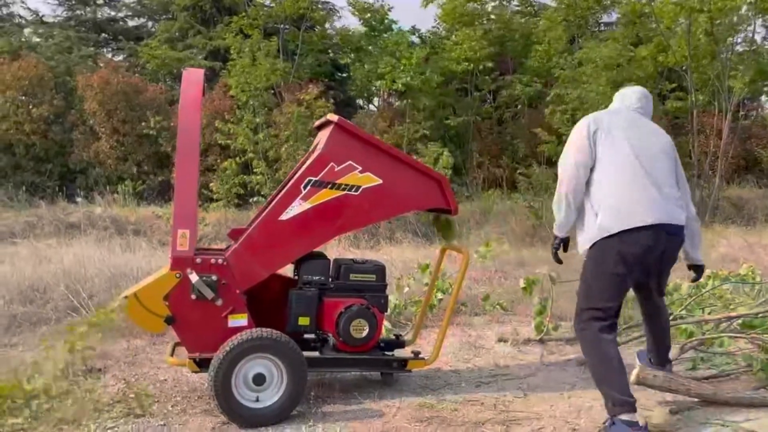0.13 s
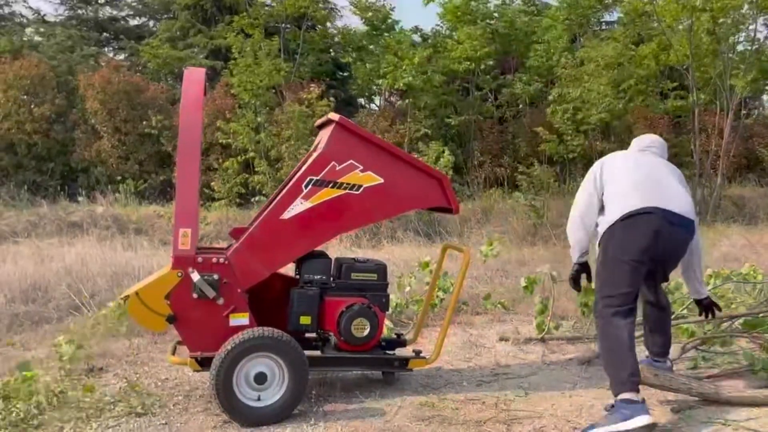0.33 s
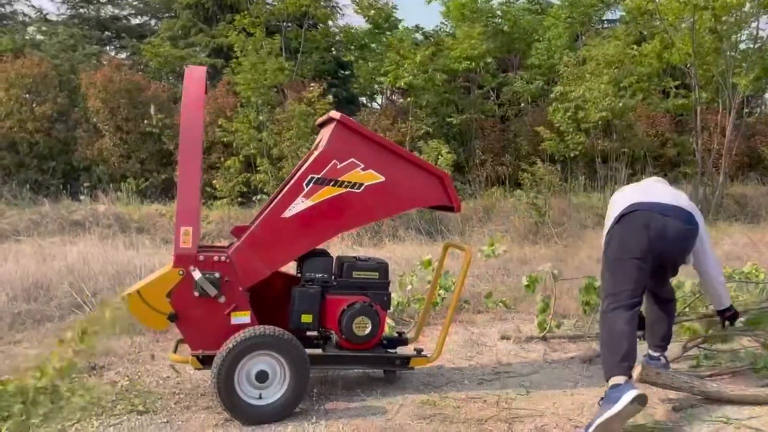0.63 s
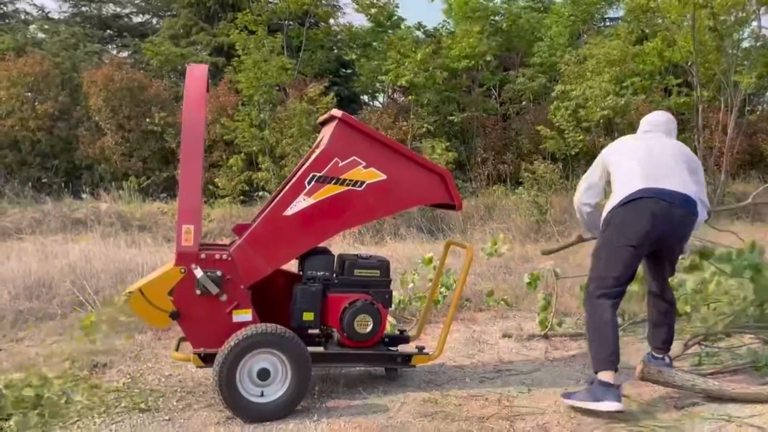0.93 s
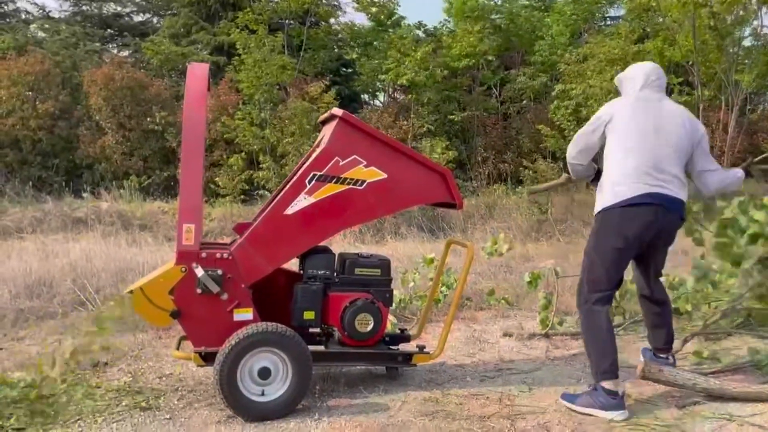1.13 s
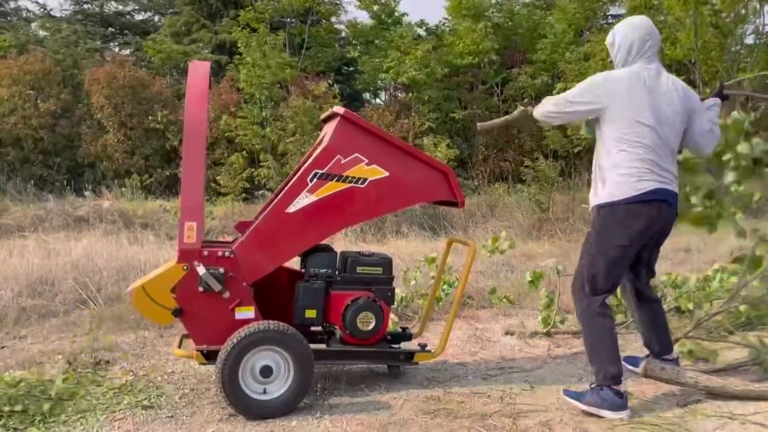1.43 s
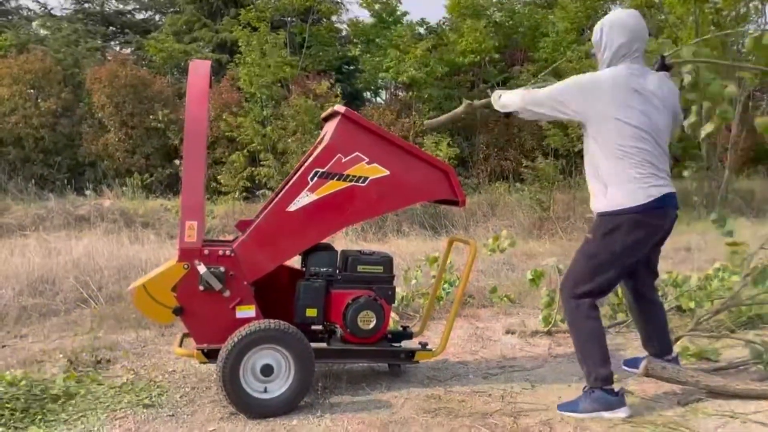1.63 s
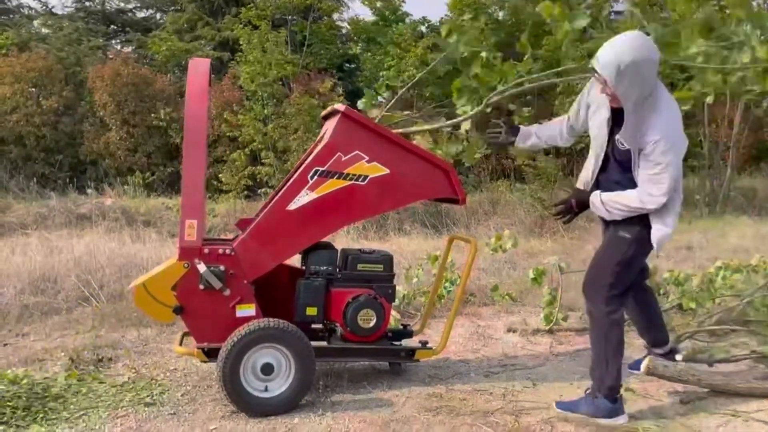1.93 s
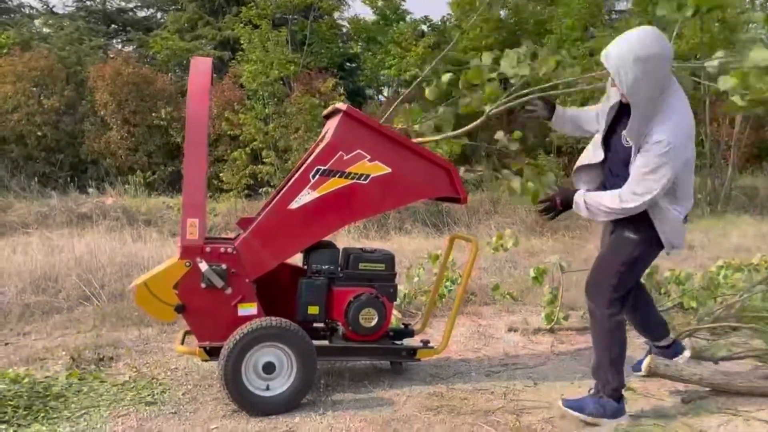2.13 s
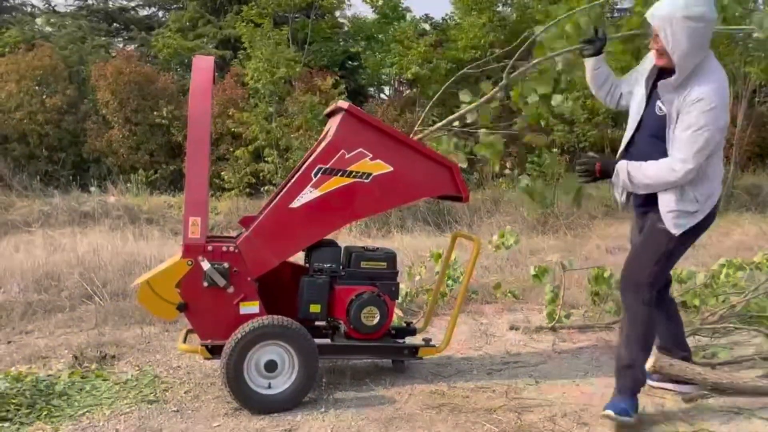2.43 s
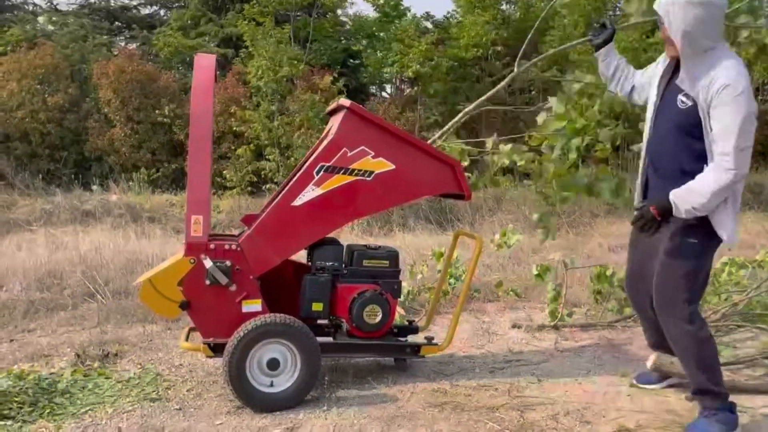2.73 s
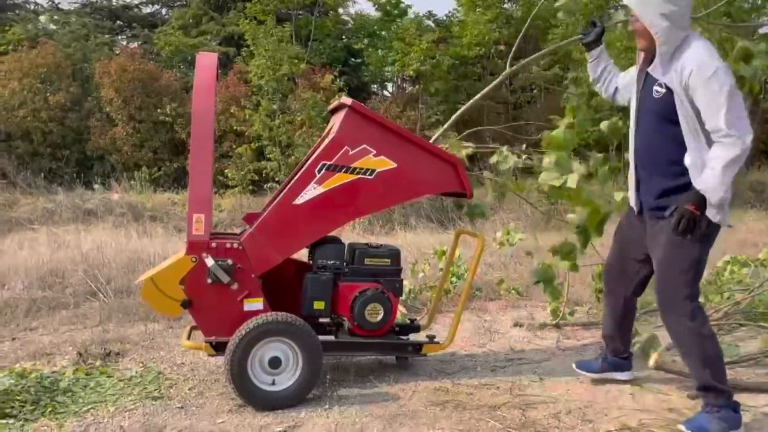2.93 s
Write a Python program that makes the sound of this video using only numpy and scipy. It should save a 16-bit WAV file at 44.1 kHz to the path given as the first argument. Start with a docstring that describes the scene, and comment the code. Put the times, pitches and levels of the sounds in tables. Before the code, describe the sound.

Loud wood chipper engine and drum drone, crunching hiss fading out, then hollow knocks on sheet steel.

```python
"""Petrol wood chipper outdoors: a one-cylinder four-stroke engine belts a two-knife drum, both wavering tones.
First the last twigs are shredded: chip grains, grinding noise, leaf crackles and decaying sine knocks.
At about 1.2 s the drum unloads and runs on empty: tone balance shifts, pulsing noise roars on.
From 1.8 s a new branch thumps the steel hopper (decaying modes); a few faint crackles follow."""
import sys
import numpy as np
from scipy import signal
from scipy.fft import rfft, irfft
from scipy.io import wavfile
from scipy.ndimage import uniform_filter1d

SR = 44100
rng = np.random.default_rng(int(sys.argv[2]) if len(sys.argv) > 2 else 0)


def put_to_file(sound):
    """Save the sound as 16-bit audio at rate SR, in the file named by the first command-line argument."""
    columns = np.atleast_2d(sound).T  # one column per channel
    safe = np.clip(columns, -1, 1)
    whole_steps = np.round(safe * 32767)
    wavfile.write(sys.argv[1], SR, whole_steps.astype(np.int16))


def boost(x):
    """Linear amplitude factor 10**(x/20) for a level x in decibels (scalar or array-like)."""
    u = np.asarray(x, float) / 20
    return 10 ** u


N = 135828
T = np.arange(N) / SR

# firing rate and knife passing rate: (time [s], rate [Hz])
FIRING_HZ = [(0, 31), (.35, 31), (.7, 31), (1.2, 31.15), (2.3, 31.3), (2.7, 31.4), (3.08, 31.35)]
KNIVES_HZ = [(0, 80.5), (.2, 80.9), (.4, 81), (.8, 81.55), (1.05, 82.1), (1.4, 82.2), (2, 82.3),
             (3.08, 82.25)]

# engine tones under load and empty: (multiple of firing rate, relative level [dB])
ENGINE_LOADED = [(2, -8), (3, -16), (4, 1), (5, -5.5), (6, -6), (7, -11.5), (9, -12), (10, -10),
                 (11, -11.5), (12, -3.5), (14, -10.5)]
ENGINE_EMPTY = [(2, -3), (3, -31), (4, 2), (5, 0), (6, -12), (7, -12), (9, -13.5), (10, -10.5), (11, -9),
                (12, -7), (14, -17.5)]
# drum tones under load and empty: (multiple of knife rate, relative level [dB])
DRUM_LOADED = [(1, -5.5), (2, -1.5), (3, -5), (4, -5.5), (5, 2), (6, -4), (7, -8.5), (8, -15.5), (9, -22),
               (10, -15), (11, -9), (12, -16), (13, -12), (14, -18), (15, -15), (16, -9), (17, -24),
               (18, -11.5), (19, -18), (20, -18), (21, -48), (22, -21), (23, -23), (24, -13)]
DRUM_EMPTY = [(1, -10), (2, -2.5), (3, 0.5), (4, -7), (5, -2.5), (6, -4), (7, -7), (8, -12), (9, -18),
              (10, -9.5), (11, -13.5), (12, -14), (13, -18), (14, -24), (15, -28), (16, -18), (17, -16.5),
              (18, -23), (19, -17.5), (20, -25), (21, -20), (22, -23), (23, -21), (24, -16.5)]
# relative level of all engine tones, all drum tones: (time [s], level [dB])
ENGINE_LEVEL_DB = [(0, 5), (.3, 1.5), (.7, 2.5), (1.1, 1), (1.35, -2), (1.7, 0), (2.3, 1.5), (2.5, -4),
                   (2.65, -1), (3.08, -1.5)]
DRUM_LEVEL_DB = [(0, 1), (.5, -2.5), (1.2, -4.5), (1.4, -5), (1.9, -0.5), (2.5, -2), (3.08, -2.5)]
# engine order 4, boom of the exhaust; order 12, drone under the howl: (time [s], relative level [dB])
BOOM_DB = [(0, -10), (.15, 0.5), (.4, -2.5), (.6, 1), (.8, -1), (1, 4.5), (1.15, 3.5), (1.4, 1), (1.7, -1),
           (2.1, -4), (2.3, 1.5), (2.46, -9), (2.62, 9.5), (2.72, 3), (2.8, -9), (3, 8), (3.08, 7.5)]
DRONE_DB = [(0, -1), (.2, -2.5), (.38, 5), (.55, -5), (.73, 7), (.9, -4), (1.12, 2), (1.3, -1), (2, -5),
            (2.5, -10), (3.08, 1)]
# knife order 3, hum of the drum; 5, howl of the chute; 6; 7, thin note: (time [s], relative level [dB])
HUM_DB = [(0, -2), (.3, -2), (.5, 3.5), (.8, 1.5), (1, 2.5), (1.2, 5), (1.31, -0.5), (1.42, 6.5),
          (1.52, -2), (1.62, 4.5), (1.8, 1.5), (1.93, -4.5), (2.1, 0.5), (2.25, 1), (2.55, 0), (2.7, 3),
          (3.08, 4)]
HOWL_DB = [(0, -2), (.7, 0), (1.25, 7), (1.42, -6), (1.6, 4.5), (1.85, -3), (2, 6.5), (2.25, -0.5),
           (2.5, 6), (2.65, -4), (2.82, 9.5), (3.08, -17)]
SIXTH_DB = [(0, -5), (.2, 2), (.42, -5.5), (.62, 3.5), (.85, 0), (1.05, 2), (1.14, -6), (1.25, 2),
            (1.4, -5), (1.6, 1.5), (2.1, 1), (2.5, 3), (2.8, 1), (3.08, 0)]
NOTE_DB = [(0, -4), (.5, 2.5), (.85, -2.5), (1.05, 6), (1.3, -6), (1.7, 2), (2.05, 4.5), (2.3, 1),
           (2.5, -6), (2.65, -4), (2.85, 4.5), (3.08, 2.5)]
# knife orders 16 and 18, whine while wood is cut: (time [s], relative level [dB])
WHINE_DB = [(0, -7), (.18, -4), (.25, 7), (.4, 3.5), (.55, 7), (.72, 0), (1, 1), (1.3, 2), (3.08, -8)]
ENGINE_DB, DRUM_DB = -33, -30.5
ENGINE_WAVER_DB, DRUM_WAVER_DB, WAVER_HZ = 1.8, 1.3, 7
UNLOAD_MID_S, UNLOAD_LENGTH_S = 1.19, 0.48
PHASE_SPREAD_TURNS = .7  # under 1 the orders add up to a soft pulse per pass

# chip hiss before its final fade: (time [s], level [dB])
SHRED_DB = [(0, -28.5), (.19, -30.5), (.24, -26.5), (.29, -30.5), (.49, -29.5), (.6, -30.5), (.75, -34),
            (.84, -39.5), (.93, -33.5), (.97, -39), (1.02, -36), (1.07, -38), (1.12, -41.5), (1.2, -45),
            (1.3, -44), (1.4, -58)]
# chips in the chute, spectrum: (frequency [Hz], relative level [dB])
CHIP_SPECTRUM = [(1500, -40), (2500, -22), (3300, -13.5), (4200, -7), (4850, -2), (5150, 2), (5400, 1.5),
                 (5700, -1), (6200, -6), (6800, -4), (7400, -6.5), (8700, -7), (9300, -13.5), (10500, -15),
                 (12000, -18), (14500, -23)]
CHIPS_PER_S, CHIP_SPREAD_DB, CHIP_DECAY_S, CLUMP_DB = 3500, 3.2, .002, .7
SHRED_OFF_S, SHRED_FADE_S = 1.375, 0.22

# wood grinding under the knives: (time [s], level [dB])
GRIND_DB = [(0, -30), (.2, -30), (.45, -32), (.7, -33.5), (.85, -39), (1, -37), (1.15, -37), (1.3, -49),
            (1.45, -58)]
# grinding spectrum: (frequency [Hz], relative level [dB])
GRIND_SPECTRUM = [(300, -15), (600, -2.5), (800, 1), (1050, -1), (1300, 0.5), (1600, -5), (2000, -2),
                  (2500, -6.5), (3300, -11.5), (4200, -17), (6000, -38)]
STRAND_DB = 3.5

# last chunks of wood knocking the housing: (time [s], level [dB], pitch [Hz])
KNOCKS = [(.133, -16, 150), (.235, -19, 201), (.768, -17, 150), (.866, -17, 130), (.925, -20, 130),
          (.996, -14, 162), (1.025, -19, 154)]
KNOCK_RISE_S, KNOCK_T60_S = 0.0046, 0.068

# dry leaves: (time [s], level [dB], decay to 1/e [s])
CRACKLES = [(.005, -42, .02), (0.096, -40, .03), (.235, -42, .03), (0.377, -40, .02), (.41, -36, .02),
            (0.49, -40, .025), (.59, -47, .02), (.68, -51, .02), (.745, -48, .02), (.915, -55, .025),
            (1.005, -45, .025), (1.05, -50, .02), (1.89, -58, .04), (2.51, -55, .03), (2.605, -56, .03)]
# crackle spectrum: (frequency [Hz], relative level [dB])
CRACKLE_SPECTRUM = [(1500, -30), (3000, 6), (7000, -12), (10000, 7), (14500, -15)]
CRACKLE_RISE_S = .004

# branch on the hopper: (time [s], level [dB], tilt [dB per octave above TILT_FROM_HZ])
THUMPS = [(1.81, -12.5, -3), (1.851, -14.5, 0), (1.885, -17, -3), (1.909, -18, 2), (1.945, -19, -6),
          (1.967, -18, -6), (2.13, -30, -10)]
# hopper modes: (frequency [Hz], relative level [dB], t60 [s])
HOPPER_MODES = [(96, -4, 0.12), (140.7, -3.5, 0.36), (175, -3, 0.1), (317, -12, 0.18), (400, -14, 0.088),
                (470, -5.5, 0.16), (593, -6, 0.08), (850, -13, .1), (1260, -24, 0.051), (1920, -20, 0.096)]
THUMP_RISE_S, TILT_FROM_HZ, MODE_DROP_DB = 0.007, 140, 3.3

# machine roar (exhaust, air, panels), spectrum: (frequency [Hz], relative level [dB])
ROAR_SPECTRUM = [(18, -63), (30, -19), (50, -7.5), (100, -3.5), (150, -5.5), (210, -8), (300, -10),
                 (420, -6), (520, -11), (650, -15), (880, -11), (1090, -15.5), (1300, -10.5), (1700, -22.5),
                 (2050, -16), (2300, -19.5), (2550, -24), (3200, -25.5), (4200, -24), (4900, -22),
                 (5400, -19.5), (5800, -25), (6500, -26.5), (8000, -30.5), (9000, -37), (11600, -36.5),
                 (14500, -48)]
# roar below the treble, before ROAR_GAIN_DB: (time [s], level [dB])
ROAR_LEVEL_DB = [(1.2, -40), (1.482, -38), (1.624, -39), (1.854, -35.5), (2.11, -38.5), (2.136, -35),
                 (2.152, -39), (2.294, -37), (3.058, -36), (3.08, -41)]
# treble rasp of the drum housing, before RASP_GAIN_DB: (time [s], level [dB])
RASP_LEVEL_DB = [(1.3, -53), (1.422, -53.5), (1.894, -49.5), (2.232, -50), (2.34, -53), (2.384, -50),
                 (2.414, -53), (2.648, -48), (2.668, -52.5), (2.708, -50), (3.03, -51.5), (3.08, -52)]
ROAR_GAIN_DB, RASP_GAIN_DB = 10, 14.5
FIRE_DEPTH, KNIFE_DEPTH, THROB_DEPTH = .05, .07, .45
THROB_BELOW_HZ, RASP_ABOVE_HZ = 350, 3600

PANEL_DB, PANEL_SPACING_HZ, PATCH_DB = 1.7, 25, 1.8
# microphone, a narrow dip and the band limit: (frequency [Hz], gain [dB])
MIC = [(5, -20), (20, -9), (40, 0), (6800, 0), (7100, -5), (7500, -3), (7900, -12), (8150, -17), (8400, -6),
       (8700, 0), (13900, 0), (14450, -6), (14600, -60), (22050, -60)]


def evened(x):
    """Scales to rms 1."""
    return x / np.sqrt(np.mean(x ** 2) + 1e-20)


def curve(points):
    """Joins (time [s], value) rows over time."""
    return np.interp(T, *np.transpose(points))


def shape(x, points):
    """Filters x by a (frequency [Hz], gain [dB]) spectrum, on a log frequency axis."""
    f, db = np.transpose(points)
    hz = np.fft.rfftfreq(N, 1 / SR)
    gain = boost(np.interp(np.log(hz + 1), np.log(f + 1), db))
    return irfft(rfft(x) * gain, N)


def colour(x, points):
    """Shapes x by a spectrum; rms 1."""
    return evened(shape(x, points))


def wander(hz, count):
    """Slow random curves of about rms 1, low-passed at hz."""
    knots = rng.standard_normal((count, 400))
    t = np.arange(400) / 100  # 100 knots per second
    b, a = signal.butter(2, np.clip(hz / 50, .01, .9))
    smooth = signal.lfilter(b, a, knots)[:, 60:]  # drops the filter's start
    return np.array([np.interp(T, t[:-60], evened(row)) for row in smooth])


def patchy(x, size, bins, frames, depth_db):
    """Noise whose level varies in random patches of bins by frames; depth_db per bin or one value."""
    z = signal.stft(x, nperseg=size, noverlap=size * 3 // 4)[2]
    patches = rng.standard_normal(z.shape[::-1]).T
    patches = uniform_filter1d(patches, size=bins, axis=0)
    patches = evened(uniform_filter1d(patches, size=frames, axis=1))
    return signal.istft(z * boost(depth_db * patches), nperseg=size, noverlap=size * 3 // 4)[1][:N]


def orders(turns, loaded, empty, waver_db, order_db):
    """Tones on multiples of a rate, each wavering, their balance changing as the load goes."""
    load = np.clip(.5 - (T - UNLOAD_MID_S) / UNLOAD_LENGTH_S, 0, 1)
    wavers = wander(WAVER_HZ, count=len(empty))
    starts = rng.random(len(empty))
    out = np.zeros(N)
    for (k, full_db), (_, empty_db), waver, start in zip(loaded, empty, wavers, starts):
        level_db = empty_db + (full_db - empty_db) * load + waver_db * waver + order_db.get(k, 0)
        phase = k * turns + PHASE_SPREAD_TURNS * start
        out += np.sqrt(2) * boost(level_db) * np.cos(2 * np.pi * phase)
    return out


def engine(firing):
    """Engine tones on multiples of the firing rate."""
    order_db = {4: curve(BOOM_DB), 12: curve(DRONE_DB)}
    tones = orders(firing, ENGINE_LOADED, ENGINE_EMPTY, ENGINE_WAVER_DB, order_db)
    return boost(ENGINE_DB + curve(ENGINE_LEVEL_DB)) * tones


def drum(knives):
    """Drum tones on multiples of the knife passing rate."""
    whine = curve(WHINE_DB)
    order_db = {3: curve(HUM_DB), 5: curve(HOWL_DB), 6: curve(SIXTH_DB), 7: curve(NOTE_DB),
                16: whine, 18: whine}
    tones = orders(knives, DRUM_LOADED, DRUM_EMPTY, DRUM_WAVER_DB, order_db)
    return boost(DRUM_DB + curve(DRUM_LEVEL_DB)) * tones


def chips(knives):
    """Dense clumped grains of wood and leaf flung through the chute by each knife."""
    t = np.arange(600) / SR
    spread_db = CHIP_SPREAD_DB * np.minimum(rng.exponential(1, N), 5)
    size = boost(spread_db + CLUMP_DB * wander(14, count=1)[0])
    chance = CHIPS_PER_S / SR * (1 + .1 * np.cos(2 * np.pi * knives))
    hits = size * (rng.random(N) < chance)
    power = signal.oaconvolve(hits ** 2, np.exp(-t / CHIP_DECAY_S))[:N]
    grains = colour(np.sqrt(abs(power)) * rng.standard_normal(N), CHIP_SPECTRUM)
    fade = np.clip((SHRED_OFF_S - T) / SHRED_FADE_S, 0, 1)
    return boost(curve(SHRED_DB)) * fade * grains


def grind():
    """Wood grinding in the housing: noise in which thin tones ring up for a moment here and there."""
    strands = patchy(rng.standard_normal(N), 4096, bins=2, frames=7, depth_db=STRAND_DB)
    return boost(curve(GRIND_DB)) * colour(strands, GRIND_SPECTRUM)


def knocks():
    """Each chunk gives one short low thud, a decaying sine."""
    t, out = np.arange(SR // 10) / SR, np.zeros(N)
    rise = np.minimum(t / KNOCK_RISE_S, 1)
    for s, level_db, hz in KNOCKS:
        at = round(s * SR)
        out[at:at + len(t)] += boost(level_db - 60 * t / KNOCK_T60_S) * rise * np.sin(2 * np.pi * hz * t)
    return out


def crackles():
    """Short wide noise bursts of dry leaf that start sharply and die away."""
    level = np.zeros(N)
    for s, db, decay_s in CRACKLES:
        rise = np.clip((T - s) / CRACKLE_RISE_S, 0, 1)
        level += boost(db) * rise * np.exp(-np.maximum(T - s, 0) / decay_s)
    return level * colour(rng.standard_normal(N) * rng.exponential(1, N), CRACKLE_SPECTRUM)


def hopper():
    """The branch knocks the sheet steel, whose modes boom briefly; glancing knocks ring mostly the low ones."""
    t, out = np.arange(SR // 3) / SR, np.zeros(N + SR)
    rise = np.minimum(t / THUMP_RISE_S, 1)
    for s, level_db, tilt_db in THUMPS:
        ring = np.zeros(len(t))
        for hz, mode_db, t60_s in HOPPER_MODES:
            octaves = max(np.log2(hz / TILT_FROM_HZ), 0)
            start_db = mode_db + tilt_db * octaves - MODE_DROP_DB * rng.random()
            ring += boost(start_db - 60 * t / t60_s) * np.sin(2 * np.pi * hz * t)
        at = round(s * SR)
        out[at:at + len(t)] += boost(level_db) * ring * rise
    return out[:N]


def roar(firing, knives):
    """Broad noise of exhaust and blower air; it pulses with each firing, its body with each knife pass."""
    fire_pulse, knife_pulse = np.cos(2 * np.pi * firing), np.cos(2 * np.pi * knives)
    noise = colour(rng.standard_normal(N) * (1 + FIRE_DEPTH * fire_pulse), ROAR_SPECTRUM)
    treble = signal.sosfiltfilt(signal.butter(2, RASP_ABOVE_HZ, "high", fs=SR, output="sos"), noise)
    low = signal.sosfiltfilt(signal.butter(2, THROB_BELOW_HZ, fs=SR, output="sos"), noise)
    throb = low * (1 + THROB_DEPTH * fire_pulse)
    body = throb + (noise - treble - low) * (1 + KNIFE_DEPTH * knife_pulse)
    rasp = boost(curve(RASP_LEVEL_DB) + RASP_GAIN_DB) * treble
    return boost(curve(ROAR_LEVEL_DB) + ROAR_GAIN_DB) * body + rasp


def steel(x):
    """Noise heard through sheet steel: narrow resonances that ring up briefly, and faint fixed ones."""
    bass_taper = np.clip(np.arange(513) / 40, 0, 1)[:, None]
    x = patchy(x, 1024, bins=4, frames=14, depth_db=PATCH_DB * bass_taper)
    hz = np.fft.rfftfreq(N, 1 / SR)
    fine = np.interp(hz / PANEL_SPACING_HZ, np.arange(1000), rng.standard_normal(1000))
    return irfft(rfft(x) * boost(PANEL_DB * fine * np.clip(hz / 1500, 0, 1)), N)


def scene():
    """Sums all sources to one channel; chips and roar pass the steel."""
    firing = np.cumsum(curve(FIRING_HZ)) / SR  # cycles
    knives = np.cumsum(curve(KNIVES_HZ)) / SR
    machine = engine(firing) + drum(knives)
    through_steel = steel(chips(knives) + roar(firing, knives))
    wood = grind() + knocks() + crackles() + hopper()
    return (machine + through_steel + wood)[None]


def low_pass(x):
    """Removes everything above the highest recorded frequency."""
    return signal.sosfilt(signal.butter(12, 15620, fs=SR, output="sos"), x)


def record(dry):
    """Applies the microphone response and returns the finished mix."""
    mix = shape(dry[0], MIC)[None]
    return low_pass(mix)


dry = scene()
out = record(dry)
put_to_file(out)
```